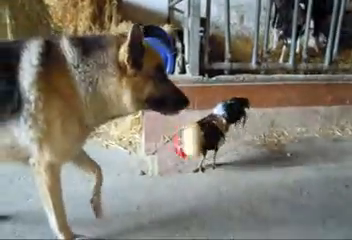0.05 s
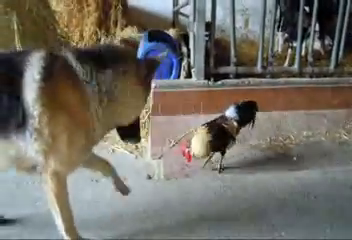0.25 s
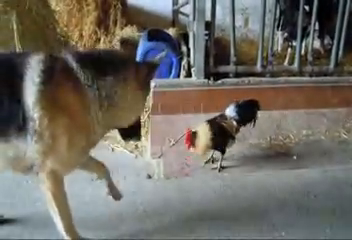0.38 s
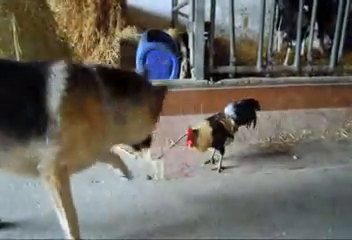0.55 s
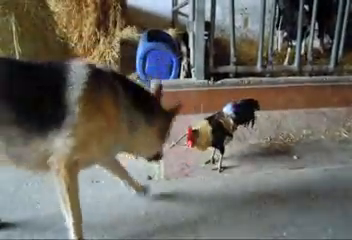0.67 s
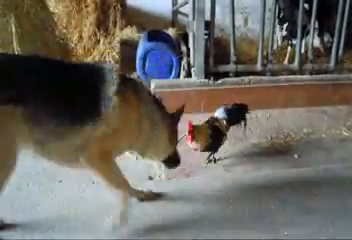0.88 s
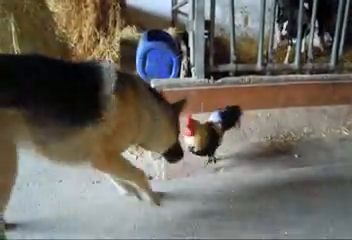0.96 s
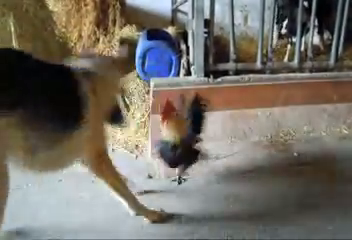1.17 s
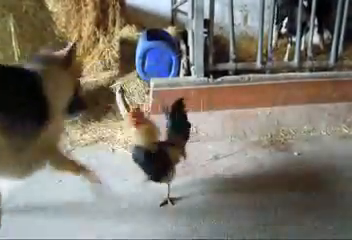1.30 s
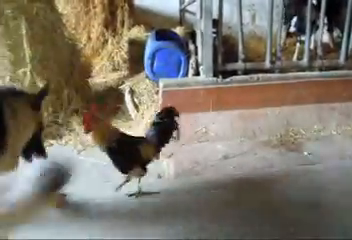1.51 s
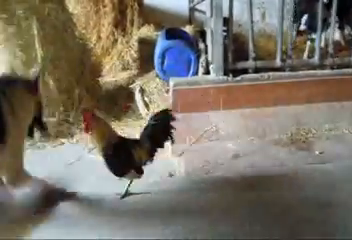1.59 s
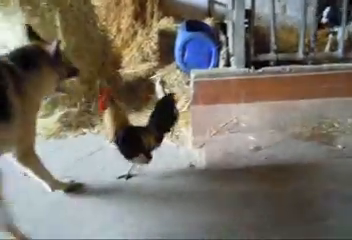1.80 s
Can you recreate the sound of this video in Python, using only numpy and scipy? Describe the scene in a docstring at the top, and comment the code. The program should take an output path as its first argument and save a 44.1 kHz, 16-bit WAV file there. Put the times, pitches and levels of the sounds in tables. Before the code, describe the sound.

Metal barrier clacks and a chain jingle, with a dog's claws ticking in a barn.

```python
"""A cow barn with a concrete floor, heard in mono, where a dog lunges at a rooster.
A machine hums over a steady wash of air. Impacts make the feed barrier clack and thud and excite
the modes of its bars. Claws tick in brief hard contacts, a paw skids with friction over grit, and
loose steel, like a chain, jingles as its links collide. The hard walls reflect the sound as
reverberation."""
import sys
import numpy as np
from scipy import signal
from scipy.fft import irfft
from scipy.io import wavfile
from scipy.ndimage import uniform_filter1d

SR = 44100
rng = np.random.default_rng(int(sys.argv[2]) if len(sys.argv) > 2 else 0)


def generate_wav(sig):
    """Save sig (samples, or channels by samples) to the path in sys.argv[1] as 16-bit PCM at SR."""
    pcm = np.round(np.clip(np.atleast_2d(sig).T, -1, 1) * 32767).astype(np.int16)
    wavfile.write(sys.argv[1], SR, pcm)


N = 81585
T = np.arange(N) / SR
BAND_EDGE_HZ = 7810

# spectrum of the air: frequency_hz, gain_db
AIR_SPECTRUM = [(20, 0.5), (48, 5.5), (70, -1), (130, -1), (200, 1), (300, 5.5), (450, 2), (600, 3.5),
                (720, 3), (880, 4), (1200, 1.5), (1500, -0.5), (1950, -3.5), (3300, -1), (4800, -5),
                (7500, -3)]
# envelope of the air: time_s, level_db
AIR_ENVELOPE = [(0, -32), (.5, -30), (.9, -31.5), (1.4, -32), (1.85, -33.5)]
# harmonics of the machine, before its fade: harmonic_number, level_db, width_hz
HUM_HARMONICS = [(1, -43.5, 26), (2, -46.5, 13), (3, -47, 25), (4, -52.5, 28), (5, -46, 40)]
# envelope of its pure tone, before the fade: time_s, level_db
HUM_TONE_ENVELOPE = [(0, -48), (.43, -48), (.5, -39), (.58, -35.5), (.72, -46), (.86, -42), (1.1, -50),
                     (1.85, -47)]

# clacks of the feed barrier: start_s, level_db, decay_s, bass_cut_hz
BARRIER_CLACKS = [(.1497, -21, 0.0036, 201), (0.1522, -14.5, .0035, 500), (.1605, -13, 0.0043, 796),
                  (.176, -28.5, .006, 202), (.546, -23, 0.0058, 2010), (.5585, -20, .0045, 2500),
                  (.575, -21, 0.0096, 1990), (.595, -27, 0.0088, 800), (.623, -28, 0.009, 500),
                  (.655, -42, 0.0056, 497), (1.474, -38.5, .006, 800), (1.489, -23, 0.0039, 1200)]
# spectrum of a clack: frequency_hz, gain_db
CLACK_SPECTRUM = [(100, -21.5), (400, 0), (650, -3), (900, -2), (1250, 0.5), (1550, 2), (1900, -2),
                  (2400, -2), (3300, -4), (4800, -1.5), (7000, 1), (8000, 5)]
# hollow thuds of the barrier: start_s, level_db
BARRIER_THUDS = [(0.1423, -24), (.167, -20), (.219, -22), (.55, -37), (1.432, -37), (1.46, -35)]
# modes of its frame: pitch_hz, level_db, t60_s
FRAME_MODES = [(196, -9.5, 0.047), (253, -3, 0.071), (292, 2.5, .08), (337.3, -1.5, 0.11),
               (374, -6.5, 0.085), (455, -8.5, 0.045), (521, -17.5, 0.057)]
# spectrum of the dull push in a thud: frequency_hz, gain_db
PUSH_SPECTRUM = [(100, -25.5), (170, -12), (260, -8.5), (340, -2), (420, 1.5), (560, -10), (750, -18.5),
                 (1500, -28), (8000, -52.5)]

# claws striking concrete: start_s, level_db, centre_hz
CLAW_TICKS = [(0.5615, -19, 3960), (.5635, -21, 4960), (0.8973, -12, 7360), (0.927, -21, 6500),
              (1.031, -20.5, 5500), (1.0337, -17, 6500), (1.0609, -15, 4000), (1.063, -15.5, 6700),
              (1.0721, -7.5, 6700), (1.0747, -20, 6000), (1.087, -24, 6500), (1.096, -17, 6700),
              (1.0995, -19.5, 6700), (1.1225, -20, 6500), (1.1267, -15, 6500), (1.1285, -12, 7400),
              (1.164, -13.5, 5000), (1.6986, -14.5, 7400)]

# chinks of one small steel ring: start_s, level_db
RING_CHINKS = [(.578, -37.5), (1.282, -28), (1.344, -28.5), (1.382, -27), (1.43, -35), (1.473, -24),
               (1.536, -28)]
# modes of that ring: pitch_hz, level_db, t60_s
RING_MODES = [(5523, 0, .2), (5570, -7, .14), (5625, -6, .16)]

# skids of a paw: start_s, rise_s, fall_s, grit_db, rub_db
PAW_SKIDS = [(1.125, 0.042, 0.042, -20, -27.5), (1.425, 0.052, 0.03, -28.5, -40),
             (1.68, 0.028, .06, -38, -50)]
# spectrum of crunching grit: frequency_hz, gain_db
GRIT_SPECTRUM = [(300, -22), (900, -8), (1500, -4.5), (2200, -2), (3500, -2), (4700, 0), (6300, 3),
                 (8000, 1)]
# spectrum of the rubbing pad: frequency_hz, gain_db
RUB_SPECTRUM = [(100, -26.5), (300, -12), (500, 1.5), (800, -1.5), (1100, -6.5), (1500, -11), (2500, -19.5),
                (8000, -30)]

# barrier bars set ringing: start_s, level_db, pitch_hz, relative_overtone_db
BAR_STRIKES = [(1.143, -32, 1478, -14), (1.287, -25, 1531, 1.5)]

# collisions of steel links: start_s, clash_db, ringing_db
LINK_STRIKES = [(1.2622, -17, -29), (1.2665, -18, -29), (1.2745, -10, -21), (1.2824, -15, -24),
                (1.293, -17, -19.5), (1.301, -19.5, -21), (1.342, -23, -30.5), (1.358, -22, -28),
                (1.383, -29, -30), (1.444, -30, -34), (1.477, -27, -32), (1.546, -40, -43)]
# modes of the links: pitch_hz, level_db, t60_s
LINK_MODES = [(2615, -15, .15), (3553, -16, .35), (4018, -9, .24), (4204, -9, .24), (4377, -9, .18),
              (4800, -10, .15), (5389, -2, .15), (5826, -5, .13), (6046, -5, .12), (6115, -7, .22),
              (6735, 3, .2), (6850, 1, .24), (6882, 2, .22), (7176, -1, .3), (7267, -2, .2), (7385, 0, .25),
              (7701, -2, .25)]
# spectrum of their clash: frequency_hz, gain_db
CLASH_SPECTRUM = [(200, -36), (900, -17.5), (1750, -20), (2300, -10), (3000, -13), (3700, -10),
                  (4400, -4.5), (5100, -3.5), (5900, 2.5), (6450, -2), (7200, 3.5), (8000, -3)]

# reverberation time of the barn: frequency_hz, t60_s
BARN_T60 = [(100, 0.83), (300, 0.64), (1000, 1.0), (2500, 1.0), (5000, 0.74), (8000, 0.46)]


def amp(db):
    """Amplitude ratio for a level in decibels."""
    return 10 ** (np.asarray(db) / 20)


def unit_rms(x):
    """Normalisation to an rms of 1."""
    return x / np.sqrt(np.mean(x ** 2) + 1e-20)


def value_at(points, hz):
    """Interpolation of a table on a log-frequency axis."""
    table_hz, values = np.transpose(points)
    return np.interp(np.log(hz + 1), np.log(table_hz + 1), values)


def colour(x, spectrum, size=4096):
    """Minimum-phase filtering, scaled so that white noise keeps its power below the band edge."""
    hz = abs(np.fft.fftfreq(size, 1 / SR))
    gain = amp(value_at(spectrum, hz))
    gain /= np.sqrt(np.mean(gain ** 2 * (hz < BAND_EDGE_HZ)))
    log_response = np.conj(signal.hilbert(np.log(gain)))
    taps = np.fft.ifft(np.exp(log_response)).real
    return signal.fftconvolve(x, taps[:size // 2])[:N]


def contact_noise(decay_s, rise_s=0.0019):
    """A rough impact radiates noise with a linear rise and an exponential decay."""
    decay = np.exp(-np.maximum(T - rise_s / 2, 0) / decay_s)
    return rng.standard_normal(N) * np.minimum(T / rise_s, 1) * decay


def free_vibration(modes, spread_db):
    """A struck body vibrates as a sum of damped modes, in random phase and with scattered levels."""
    hz, db, t60_s = np.transpose(modes)[:, :, None]
    amplitudes = amp(db + spread_db * rng.standard_normal(hz.shape))
    t = T[:SR * 3 // 4]
    decay = np.exp(-np.log(1000) * t / t60_s)
    waves = amplitudes * decay * np.sin(2 * np.pi * (hz * t + rng.random(hz.shape)))
    return waves.sum(0) / np.sqrt(np.sum(amplitudes ** 2) / 2)


def reverberate(x, room_db, build_up_s=0.0054):
    """Dense wall reflections follow the direct sound, each band decaying at its own rate."""
    hz, t, bands = signal.stft(rng.standard_normal(SR), SR, nperseg=256)
    decay = np.exp(-np.log(1000) * t / value_at(BARN_T60, hz)[:, None])
    tail = signal.istft(bands * decay, SR)[1]
    tail *= 1 - np.exp(-(T[:len(tail)] / build_up_s) ** 2)
    return x + amp(room_db) * signal.fftconvolve(x, tail / np.linalg.norm(tail))[:N]


def air(patch_db=1.22):
    """Diffuse broadband noise, faintly modulated in patches of frequency and time."""
    bands = signal.stft(rng.standard_normal(N), nperseg=512)[2]
    patches = uniform_filter1d(rng.standard_normal(bands.shape), size=7, axis=0)
    patches = unit_rms(uniform_filter1d(patches, size=10, axis=1))
    wash = signal.istft(bands * amp(patch_db * patches))[1][:N]
    return colour(unit_rms(wash), AIR_SPECTRUM) * amp(np.interp(T, *np.transpose(AIR_ENVELOPE)))


def machine(pitch_hz=295.7, fade_db_per_s=3):
    """A far machine's harmonic series: a pure tone, and narrow bands that waver in the echoing barn."""
    hz = np.fft.rfftfreq(N, 1 / SR)
    tone_envelope = amp(np.interp(T, *np.transpose(HUM_TONE_ENVELOPE)))
    hum = tone_envelope * unit_rms(np.sin(2 * np.pi * pitch_hz * T))
    for harmonic, db, width_hz in HUM_HARMONICS:
        line_shape = 1 / (1 + ((hz - harmonic * pitch_hz) / (width_hz / 2)) ** 2)
        phasors = np.exp(2j * np.pi * rng.random(len(hz)))
        hum += amp(db) * unit_rms(irfft(line_shape * phasors, N))
    return hum * amp(-fade_db_per_s * (T - T.mean()))


def feed_barrier(thud_rise_s=0.0036, push_db=-3, room_db=1.5):
    """Impact excitation: bars clack on their stops; the frame gives a dull push and rings hollow."""
    clacks, thuds, pushes = np.zeros((3, N))
    for start_s, db, decay_s, cut_hz in BARRIER_CLACKS:
        bass_cut = signal.butter(1, cut_hz, "high", fs=SR)
        add(clacks, start_s, amp(db) * signal.lfilter(*bass_cut, contact_noise(decay_s)))
    for start_s, db in BARRIER_THUDS:
        frame = free_vibration(FRAME_MODES, spread_db=1)
        add(thuds, start_s, amp(db) * frame * np.minimum(T[:len(frame)] / thud_rise_s, 1))
        add(pushes, start_s, amp(db + push_db) * contact_noise(decay_s=0.011, rise_s=thud_rise_s))
    thuds += colour(pushes, PUSH_SPECTRUM)
    return reverberate(colour(clacks, CLACK_SPECTRUM), room_db) + reverberate(thuds, room_db)


def claws(decay_s=0.0013, width_hz=2300):
    """Each brief, hard contact of a claw on concrete excites one heavily damped resonance."""
    ticks = np.zeros(N)
    radius = np.exp(-np.pi * width_hz / SR)
    for start_s, db, centre_hz in CLAW_TICKS:
        resonator = [1, -2 * radius * np.cos(2 * np.pi * centre_hz / SR), radius ** 2]
        tick = signal.lfilter([1, -1], resonator, contact_noise(decay_s, rise_s=0.00025))
        tick *= np.sqrt(decay_s * SR / 2) / np.linalg.norm(tick)  # energy of a unit exponential decay
        add(ticks, start_s, amp(db) * tick)
    return reverberate(ticks, room_db=-3)


def small_ring():
    """A small steel ring chinks; its closely spaced modes beat as they decay."""
    chinks = np.zeros(N)
    for start_s, db in RING_CHINKS:
        add(chinks, start_s, amp(db) * free_vibration(RING_MODES, spread_db=3.5))
    return reverberate(chinks, room_db=-10.5)


def paw(grains_per_s=5000, grain_spread_db=3.5, rub_lag_s=0.02):
    """Sliding friction: grit crunches in random impulses, and the pad rubs as the weight comes down."""
    skids = np.zeros(N)
    for start_s, rise_s, fall_s, grit_db, rub_db in PAW_SKIDS:
        load = np.minimum(T / rise_s, 1) * np.exp(-np.maximum(T - rise_s, 0) / fall_s)
        strengths = amp(grain_spread_db * rng.standard_normal(N)) * rng.choice([-1, 1], N)
        grains = unit_rms(strengths * (rng.random(N) < grains_per_s / SR))
        add(skids, start_s, amp(grit_db) * colour(grains * load, GRIT_SPECTRUM))
        rub = colour(rng.standard_normal(N) * load, RUB_SPECTRUM)
        add(skids, start_s + rub_lag_s, amp(rub_db) * rub)
    return reverberate(skids, room_db=-3)


def bars(t60_s=0.34, overtone_ratio=2.131, overtone_t60_s=0.27):
    """A nudged steel bar vibrates freely at its fundamental and one inharmonic overtone."""
    ringing = np.zeros(N)
    for start_s, db, pitch_hz, overtone_db in BAR_STRIKES:
        modes = [(pitch_hz, 0, t60_s), (pitch_hz * overtone_ratio, overtone_db, overtone_t60_s)]
        add(ringing, start_s, amp(db) * free_vibration(modes, spread_db=0))
    return reverberate(ringing, room_db=-4.5)


def chain():
    """Each collision of links radiates a bright clash and excites the inharmonic modes of the steel."""
    clashes, ringing = np.zeros((2, N))
    for start_s, clash_db, ringing_db in LINK_STRIKES:
        add(clashes, start_s, amp(clash_db) * contact_noise(decay_s=0.0086))
        add(ringing, start_s, amp(ringing_db) * free_vibration(LINK_MODES, spread_db=3.5))
    return reverberate(colour(clashes, CLASH_SPECTRUM) + ringing, room_db=-1.5)


def add(mix, start_s, sound):
    """Superposition of a delayed sound on the mix."""
    part = mix[max(round(start_s * SR), 0):][:len(sound)]
    part += sound[:len(part)]


def scene():
    """The pressures of all sources sum at one point, alike in both channels."""
    pressure = air() + machine() + feed_barrier() + claws() + small_ring() + paw() + bars() + chain()
    return np.tile(pressure, (2, 1))


def record(dry):
    """Band limiting: a steep low-pass filter removes the treble above the band edge."""
    taps = signal.firwin(801, BAND_EDGE_HZ, window=("kaiser", 8), fs=SR)
    return signal.oaconvolve(dry, taps[None], "same")


dry = scene()
out = record(dry)
generate_wav(out)
```